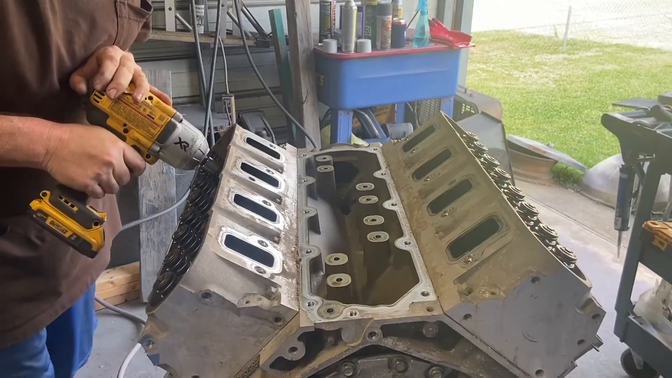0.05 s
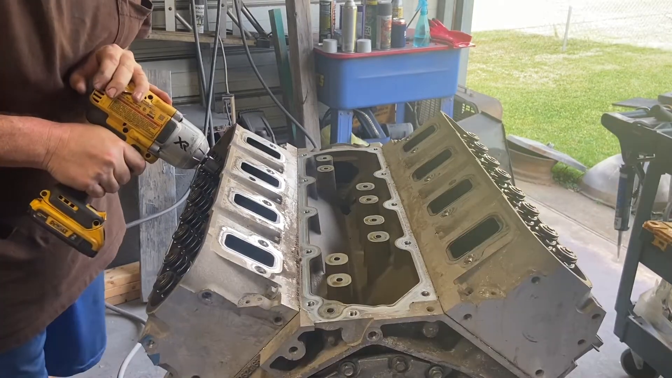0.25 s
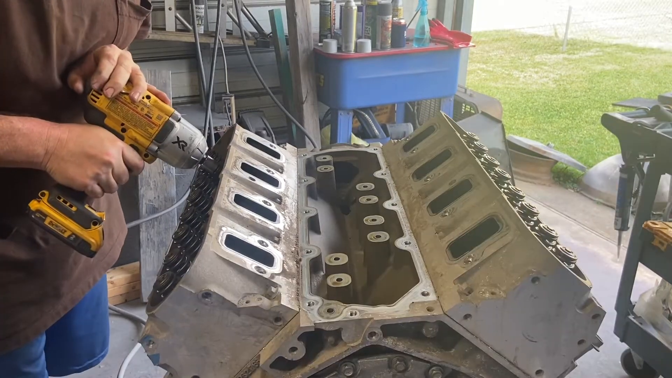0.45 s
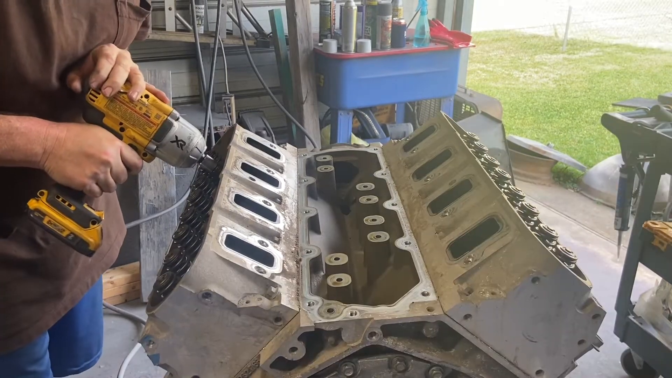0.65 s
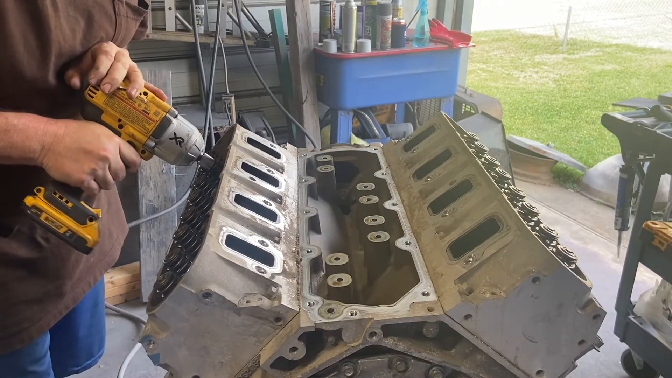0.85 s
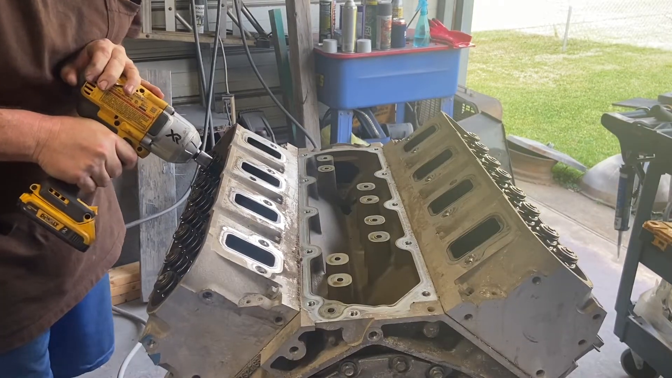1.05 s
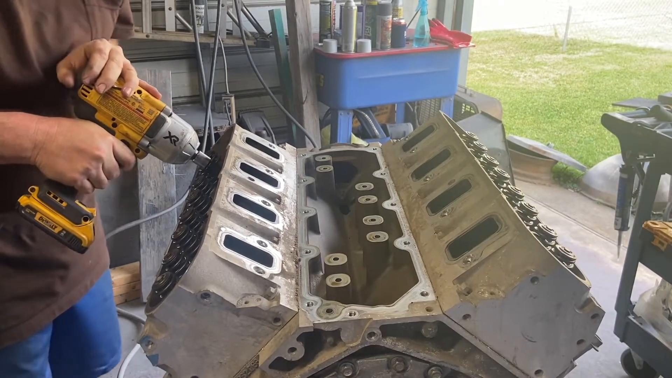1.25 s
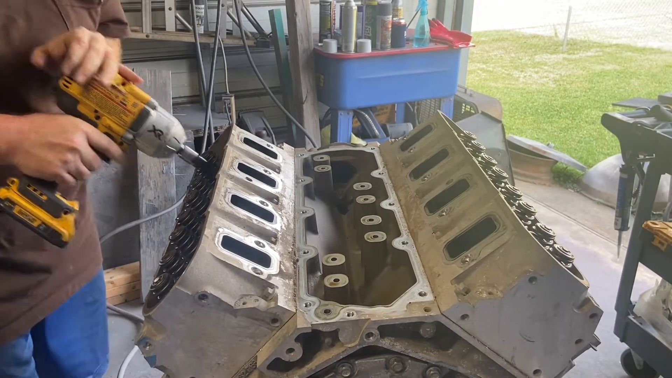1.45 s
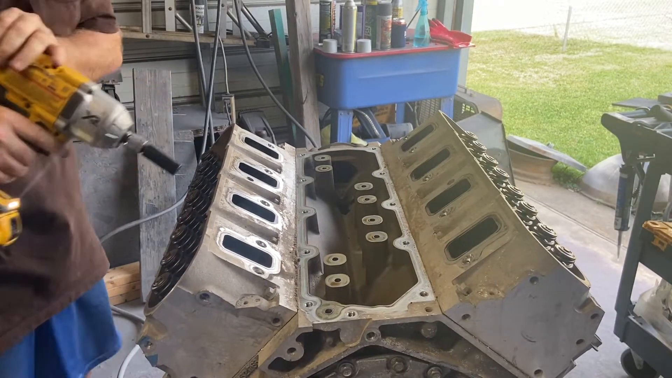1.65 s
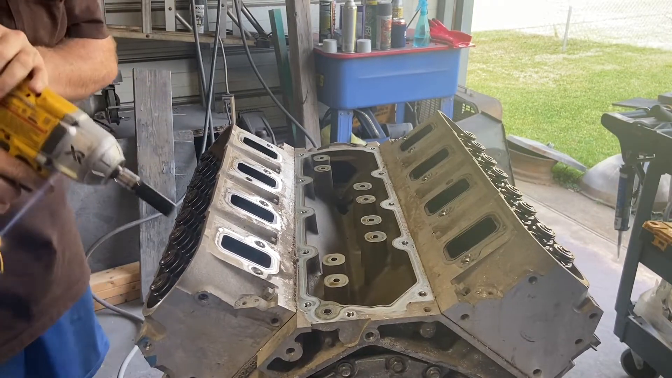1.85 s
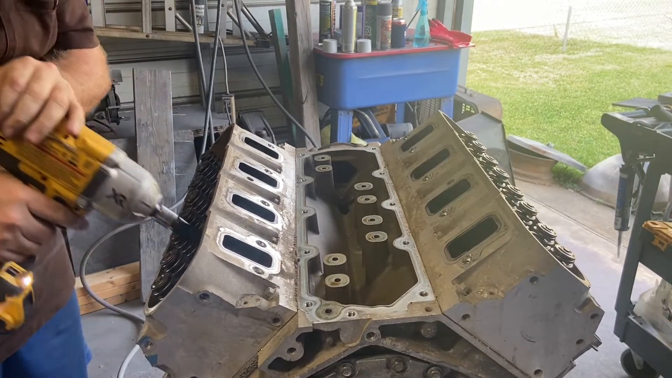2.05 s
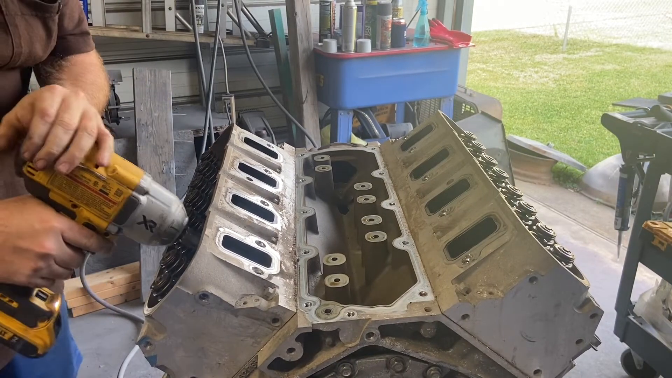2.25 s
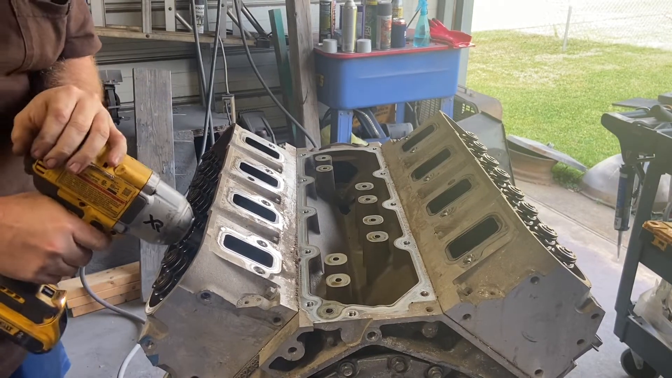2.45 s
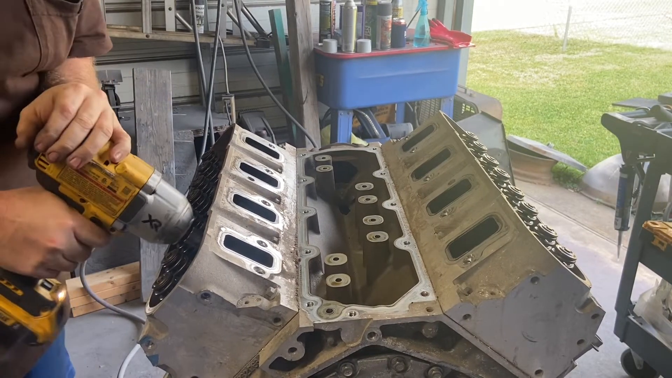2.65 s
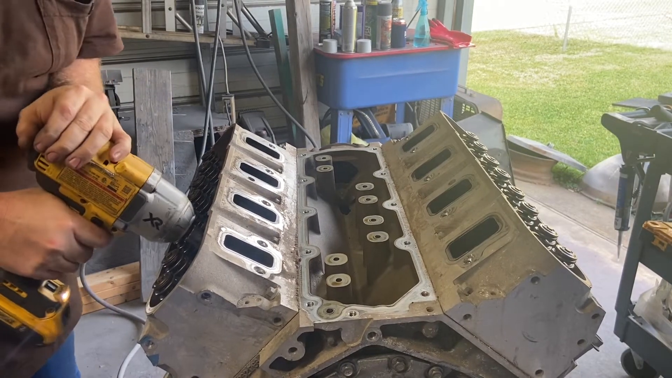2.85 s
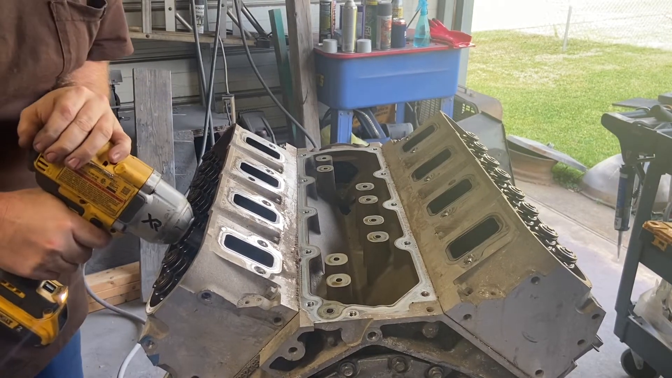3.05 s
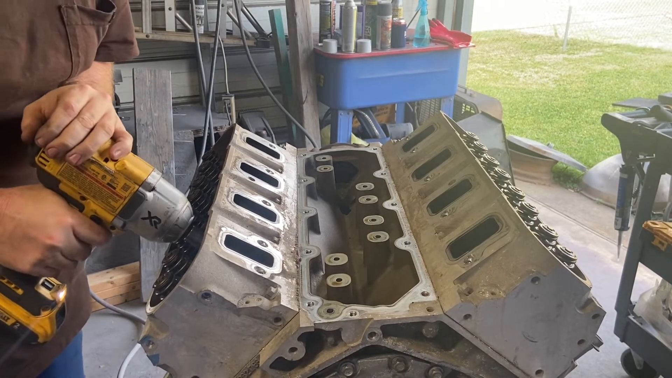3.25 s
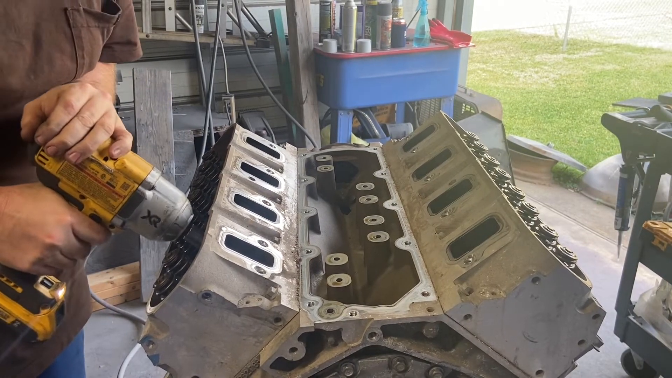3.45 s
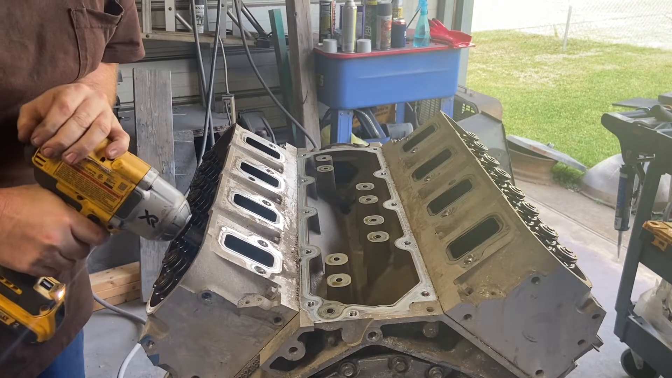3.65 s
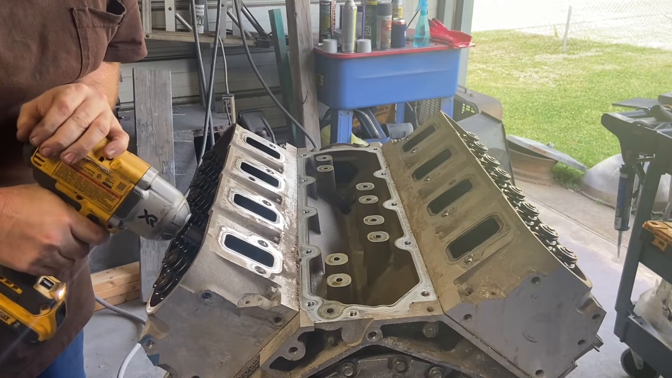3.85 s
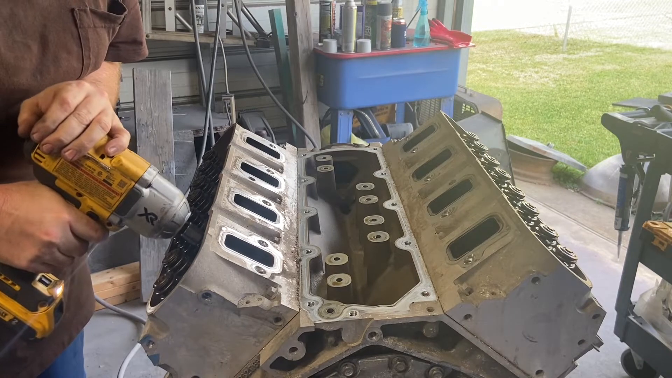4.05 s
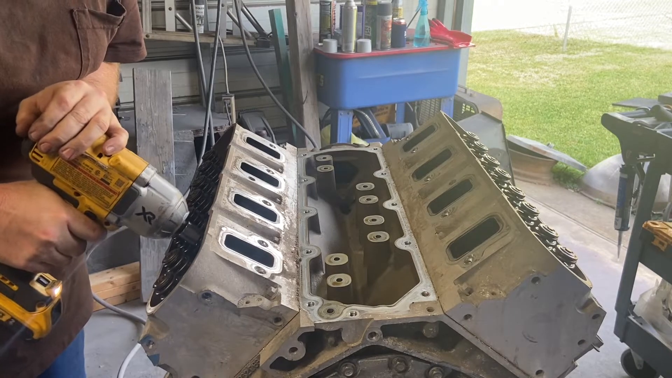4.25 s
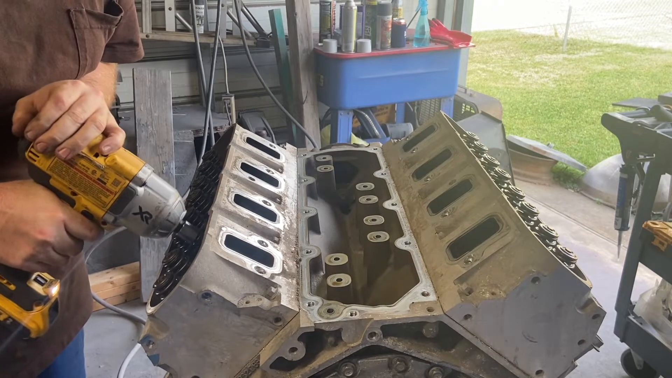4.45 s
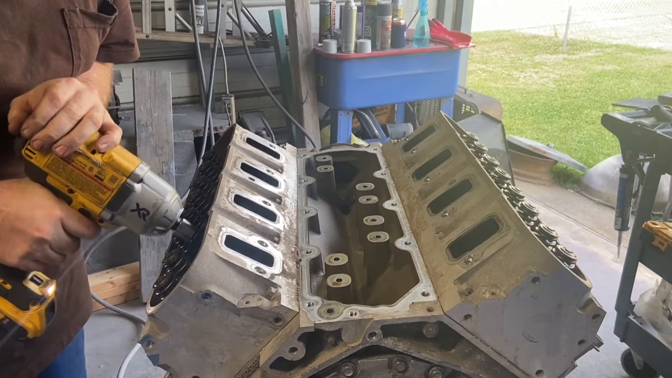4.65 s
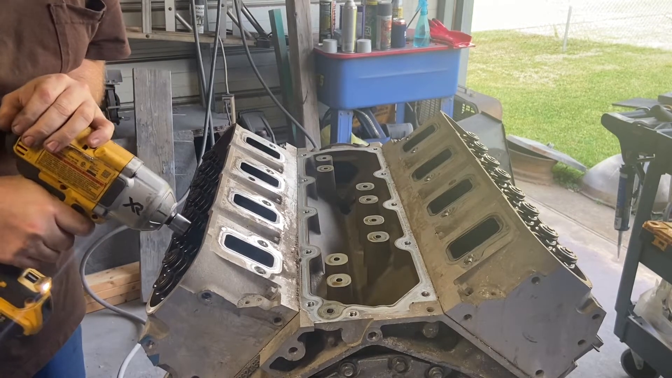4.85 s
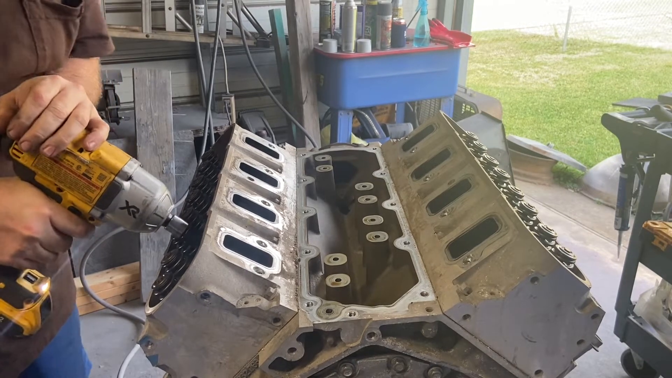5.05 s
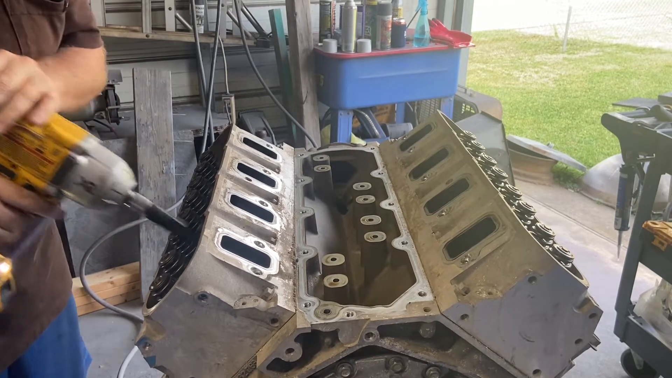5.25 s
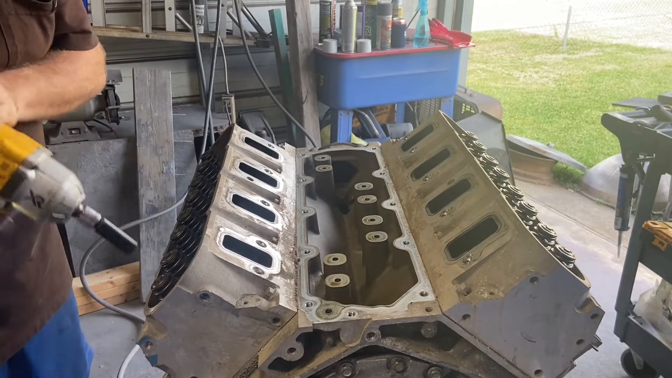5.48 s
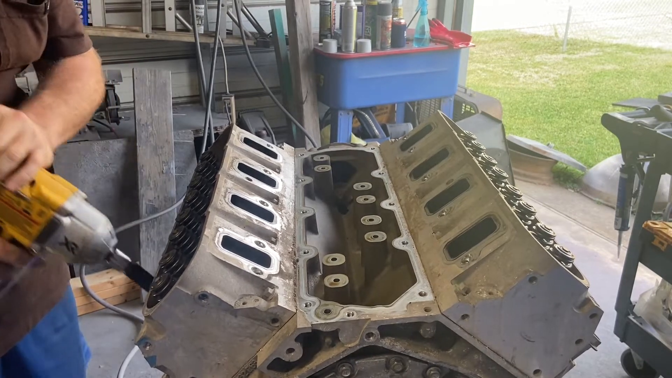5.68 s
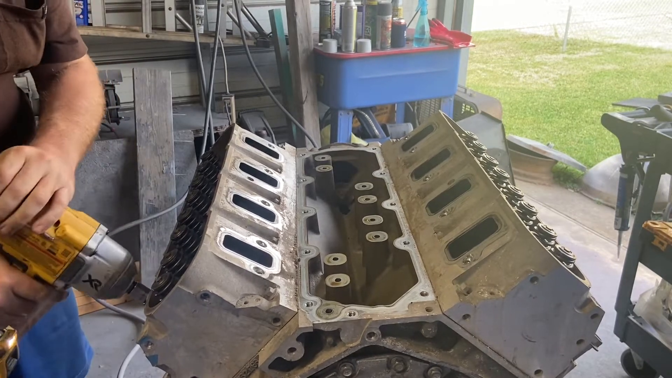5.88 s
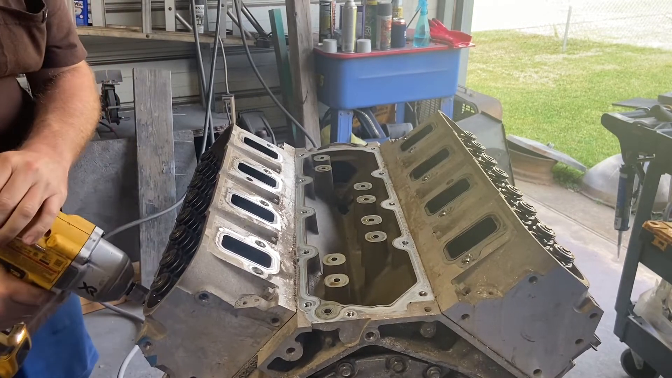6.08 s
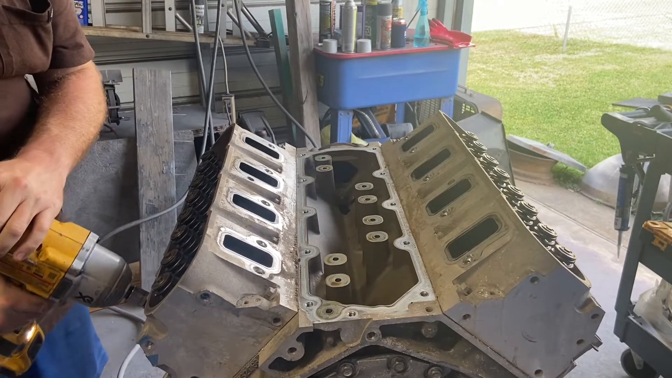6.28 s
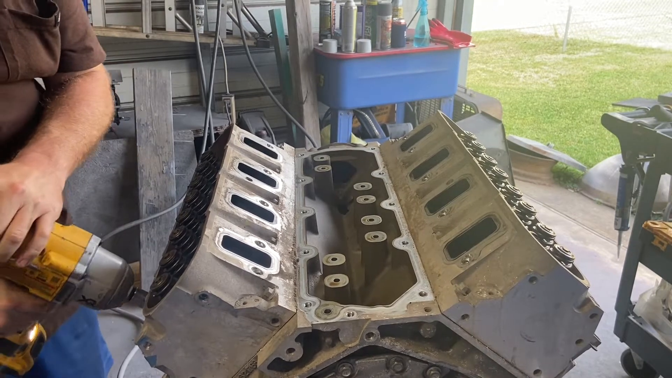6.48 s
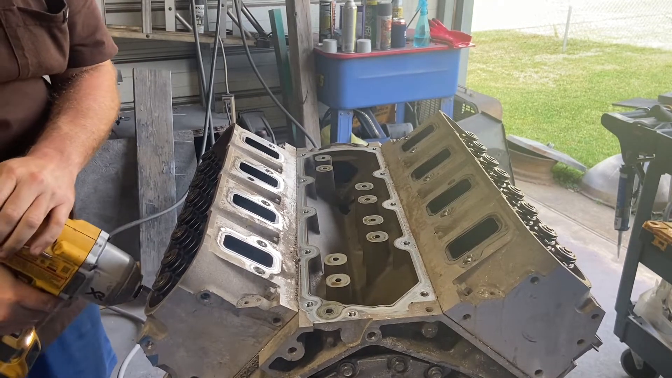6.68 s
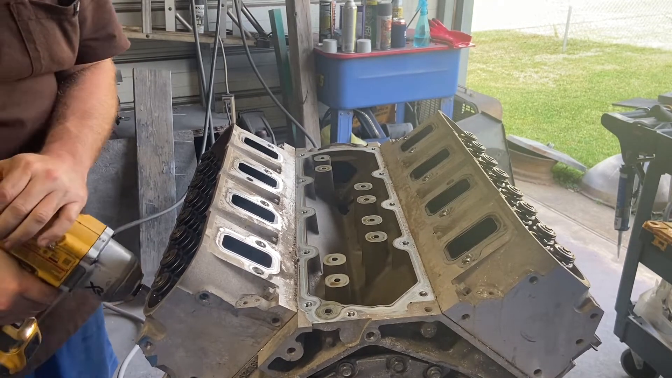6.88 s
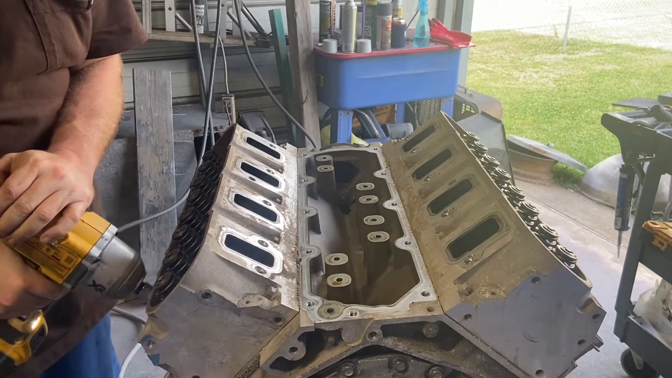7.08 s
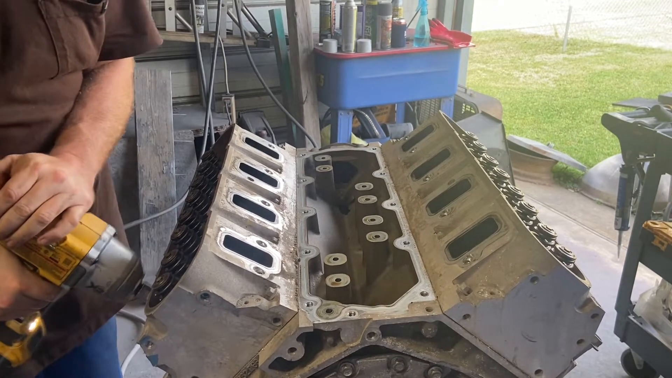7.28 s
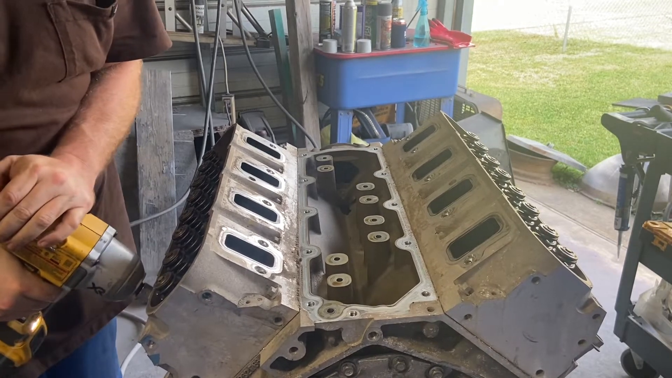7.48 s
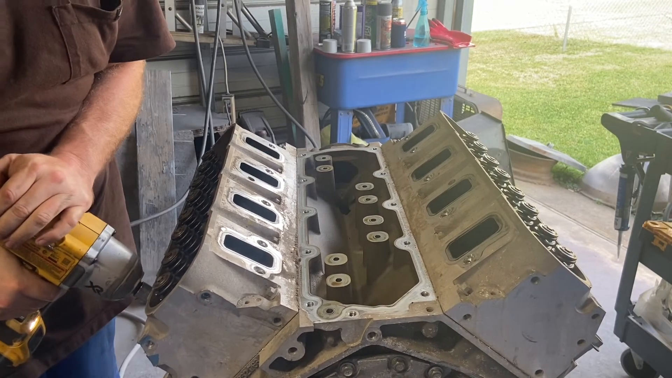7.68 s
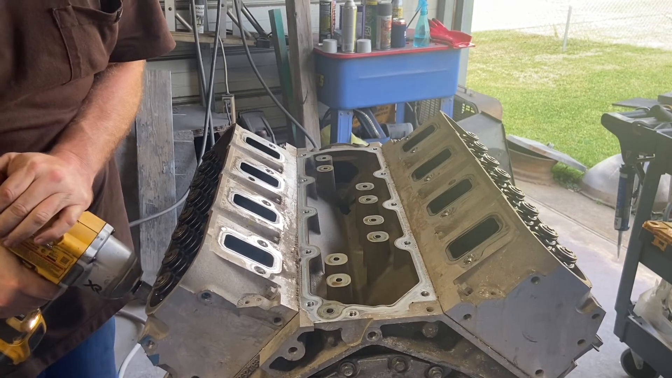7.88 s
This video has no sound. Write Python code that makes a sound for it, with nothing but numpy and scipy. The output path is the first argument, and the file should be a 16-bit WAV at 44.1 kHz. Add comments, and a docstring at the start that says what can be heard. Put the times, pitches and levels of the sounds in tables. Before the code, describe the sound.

Close, loud impact wrench on an iron engine block: a short hammering burst slows until the bolt gives, the motor whines up and brakes with a thin squeal. Socket knocks follow, then a longer burst and another spin-down, more knocks and a light scuff, and a third burst still running at the end. Open shed, short hard echoes, faint air and insects.

```python
"""A cordless impact wrench works on three bolts of an engine block in an open shed, over hum and insects.
Hammering on the first bolt slows until it gives; the freed motor whines, then brakes with a thin squeal.
Socket and trigger knock on the iron before a longer hammering frees the second bolt, with whine and brake again.
After more knocks and a scuff the third bolt is hammered and still holds at the end.
Blows are noise cracks with short rings, the motor is shaped noise and narrow bands, the shed is sparse taps."""
import sys
import numpy as np
from scipy import signal
from scipy.fft import rfft, irfft
from scipy.io import wavfile
from scipy.ndimage import uniform_filter1d

SR = 44100
rng = np.random.default_rng(int(sys.argv[2]) if len(sys.argv) > 2 else 0)


def voltage_ratio(decibels):
    """Convert decibels (scalar or array-like) to amplitude ratios, 20 dB per decade."""
    exponent = np.asarray(decibels, float) / 20
    return 10 ** exponent


def wav_out(sig):
    """Save sig, one row per channel (or a flat mono array), as 16-bit PCM at SR to the path in sys.argv[1]."""
    wavfile.write(sys.argv[1], SR, np.round(np.clip(np.atleast_2d(sig).T, -1, 1) * 32767).astype(np.int16))


N = 349272


def evened(x):
    """Normalisation of energy: scales every row to rms 1."""
    return x / np.sqrt(np.mean(x ** 2, axis=-1, keepdims=True) + 1e-20)


def read(points, hz):
    """Interpolation of a spectrum on a log-frequency axis."""
    point_hz, value = np.transpose(points)
    return np.interp(np.log(hz + 1), np.log(point_hz + 1), value)


def shelf(hz, corner_hz):
    """Shelving: the share of the treble is 0 well below the corner and 1 well above."""
    return 1 / (1 + (corner_hz / (hz + 1)) ** 4)


def add(mix, start_s, sound):
    """Superposition: adds a sound to the mix at its start time."""
    part = mix[round(start_s * SR):][:len(sound)]
    part += sound[:len(part)]


def hiss(points, size, patchy_db, treble_db=0):
    """Filtered noise: a given spectrum with drifting loud and soft patches; the treble may follow a curve."""
    real, imag, patches = rng.standard_normal((size // 128 + 5, 257, 3)).T
    patches = uniform_filter1d(patches, size=6, axis=0)
    patches = evened(uniform_filter1d(patches, size=10, axis=1))
    hz = np.fft.rfftfreq(512, 1 / SR)[:, None]
    tilt_db = np.pad(treble_db * np.ones(size), (0, 1024), "edge")[::128][:real.shape[1]]
    spectrum_db = read(points, hz) + patchy_db * patches + shelf(hz, corner_hz=7800) * tilt_db
    bins = (real + 1j * imag) * voltage_ratio(spectrum_db)
    return evened(signal.istft(bins, nperseg=512, noverlap=384)[1][:size])


def whistle(hz, width_hz, size):
    """Modulation by narrow noise: a tone blurred to a steep band of the given width."""
    r = np.exp(-np.pi * width_hz / SR)
    noise = rng.standard_normal((size + 4096, 2)) @ [1, 1j]
    blur = signal.lfilter([1], [1, -2 * r, r * r], noise)[4096:]  # settled part of the filter
    phase = 2 * np.pi * np.cumsum(hz * np.ones(size)) / SR
    return evened((blur * np.exp(1j * phase)).real)


# colour of the air from outside, relative: pitch_hz [Hz], level_db [dB per Hz]
YARD = [(35, -39.5), (55, -13.5), (90, -3), (280, -10), (700, -12), (1500, -19), (4000, -27.5),
        (7800, -36.5), (12000, -48), (16000, -63.5)]
# hum lines, then insects: pitch_hz [Hz], width_hz [Hz], level_db [dB]
HUM = [(105, 45, -59), (940, 30, -72), (9400, 600, -75), (10150, 600, -71)]


def yard():
    """Incoherent background: a broadband wash of air, wavering hum lines and a thin band of insects."""
    lines = sum(voltage_ratio(level_db) * whistle(hz, width_hz, N) for hz, width_hz, level_db in HUM)
    return voltage_ratio(-54.5) * hiss(YARD, N, patchy_db=2.0) + lines


# reverberation of the shed: pitch_hz [Hz], t60_s [s]
SHED = [(200, 0.41), (1000, 0.44), (3000, 0.36), (8000, 0.29), (15000, 0.34)]
# block, floor and wall; each comes up to 20 samples later: delay_ms [ms], level_db [dB over direct]
ECHOES = [(4.7, -8), (12, -14), (17, -13)]


def shed(x, direct, wet_db):
    """Reverberation: direct sound and near echoes, then sparse taps that build up and die band by band."""
    taps = np.zeros(SR)
    at = np.arange(300, SR - 20, 20) + rng.integers(0, 20, (SR - 301) // 20)
    taps[at] = rng.choice([-1., 1.], len(at))
    hz, t, bins = signal.stft(taps, SR, nperseg=128)
    decay_db = -60 * t / read(SHED, hz)[:, None]
    response = signal.istft(bins * voltage_ratio(decay_db), SR, nperseg=128)[1][:SR]
    response *= 1 - np.exp(-np.arange(SR) / SR / 0.016)  # build-up
    response *= voltage_ratio(wet_db) / np.linalg.norm(response)
    response[0] = direct
    for delay_ms, level_db in ECHOES:
        response[round(delay_ms * SR / 1000 + 20 * rng.random())] += direct * voltage_ratio(level_db)
    return signal.fftconvolve(x, response)[:N]


# colour of gear noise and of scuffs, relative: pitch_hz [Hz], level_db [dB per Hz]
GEARS = [(88, -45), (150, -21.5), (448, -2.5), (624, -6), (854, -2), (1630, -4.5), (2760, -1.5),
         (11300, -10.5), (16000, -21.5)]
# trigger pulls: squeezed_s, bolt_gives_s, released_s, rotor_stops_s [s], squeal_db [dB]
PULLS = [(-.8, .82, 1.362, 1.66, -44), (2.51, 4.63, 5.072, 5.38, -55), (6.945, 8.6, 9.1, 9.4, -50)]
# gears and fan around moments of a pull: offset_s [s from the moment], level_db [dB], treble_change_db [dB]
AFTER_SQUEEZE = [(-.004, -80, -8), (0, -46, -8), (.03, -34, -9), (.06, -24, -4), (.14, -23, 5),
                 (.5, -28, 1.5)]
AFTER_GIVE = [(-.02, -32, 6), (.125, -34, -6)]
AT_STOP = [(-.21, -37.5, 3), (-.14, -40.5, -12), (0, -48, -10.5), (.065, -60, -7.5), (.13, -71, -5)]


def gear_rattle():
    """Amplitude modulation: uneven tooth contacts roughen broadband gear noise through every pull."""
    stages = []
    for squeeze_s, give_s, _, stop_s, _ in PULLS:
        for moment_s, rows in ((squeeze_s, AFTER_SQUEEZE), (give_s, AFTER_GIVE), (stop_s, AT_STOP)):
            stages += [(moment_s + offset_s, db, treble_db) for offset_s, db, treble_db in rows]
    s, db, treble_db = np.transpose(stages)
    t = np.arange(N) / SR
    contacts = voltage_ratio(13.0 * uniform_filter1d(rng.standard_normal(N), size=60))
    noise = hiss(GEARS, N, patchy_db=1.6, treble_db=np.interp(t, s, treble_db))
    return voltage_ratio(np.interp(t, s, db)) * evened(noise * contacts)


def whine(t, spin_hz, braked_s):
    """Rotational tone: the whine swells as the freed rotor speeds up, then falls and dies as the brake bites."""
    hz = np.maximum(spin_hz - 17000 * braked_s, 4000)  # braking in Hz per s
    fade_db = 30 * braked_s + 600 * np.maximum(braked_s - .06, 0)
    return np.minimum(t / .4, 1) * voltage_ratio(-47.5 - fade_db) * whistle(hz, 40, len(t))


def gear_mesh(t, spin_hz, braked_s):
    """Tooth-passing tone: a fixed ratio to the unbraked whine, sagging under the brake, with its octave."""
    hz = .433 * spin_hz - 1100 * braked_s
    level_db = -42.5 - 8 * t - 30 * braked_s
    octave = voltage_ratio(level_db - 9 - 90 * braked_s) * whistle(2 * hz, 50, len(t))
    return voltage_ratio(level_db) * whistle(hz, 50, len(t)) + octave


def brake_squeal(squeal_db):
    """Narrow-band radiation: the electric brake squeals high, holds briefly and fades exponentially."""
    t = np.arange(SR // 2) / SR
    level_db = squeal_db - 140 * np.maximum(t - .09, 0)
    return np.minimum(t / .015, 1) * voltage_ratio(level_db) * whistle(14930, 50, len(t))


def housing(seconds):
    """Resonance: the housing sings in one narrow band until the rotor stops."""
    t = np.arange(0, seconds, 1 / SR)
    return voltage_ratio(-56) * np.sin(np.pi * t / seconds) ** .5 * whistle(6750, 200, len(t))


def motor():
    """Superposition of machine sounds: rattle in every pull, whine, mesh and braking in free spin."""
    out = gear_rattle()
    loaded_hz, free_hz, spin_up_s, coast_s = 5050, 6750, .3, .14
    for _, give_s, release_s, stop_s, squeal_db in PULLS[:2]:  # the last bolt still holds
        t = np.arange(0, stop_s - give_s, 1 / SR)
        driven_s = np.minimum(t, release_s - give_s)
        spin_hz = free_hz - (free_hz - loaded_hz) * np.exp(-driven_s / spin_up_s)
        braked_s = np.maximum(t - release_s + give_s, 0)
        add(out, give_s, whine(t, spin_hz, braked_s))
        add(out, give_s, gear_mesh(t, spin_hz, braked_s))
        add(out, release_s + .062, brake_squeal(squeal_db))
        add(out, stop_s - coast_s, housing(coast_s))
    return out


# hands and socket scuffing on the tool, one list a scuff: start_s [s], level_db [dB]
SCUFF = [
    [(2.45, -61), (2.51, -59)],
    [(6.2, -87), (6.4, -62), (6.5, -57), (6.7, -85)],
    [(6.89, -53), (6.95, -52)],
]


def scuffs():
    """Friction noise: rubbing is patchy noise in the gear colour with its treble cut."""
    out = np.zeros(N)
    for rows in SCUFF:
        s, db = np.transpose(rows)
        level_db = np.interp(np.arange(s[0], s[-1], 1 / SR), s, db)
        rub = hiss(GEARS, len(level_db), patchy_db=6.5, treble_db=-18)
        add(out, s[0], voltage_ratio(level_db) * rub)
    return out


# colour of a crack before its treble change, relative: pitch_hz [Hz], level_db [dB per Hz]
STEEL = [(88, -42.5), (150, -32), (226, -29.5), (422, -12.5), (624, -8.5), (1310, -6.5), (2980, -1),
         (5360, -4.5), (10200, -4.5), (16000, -13)]


def strikes(hz, treble_db, decay_s, ring_db, ring_s):
    """Impact excitation, one row a strike, rms 1 over 2 ms: a dying crack and a short ring at its own pitch."""
    t, f = np.arange(2048) / SR, np.fft.rfftfreq(2048, 1 / SR)
    colour = voltage_ratio(read(STEEL, f) + treble_db[:, None] * (shelf(f, corner_hz=4700) - .5))
    crack = evened(irfft(rfft(rng.standard_normal((len(hz), 2048))) * colour))
    crack *= (1 - np.exp(-t / 0.00005)) * np.exp(-t / decay_s[:, None])
    ring = np.sin(2 * np.pi * hz[:, None] * t)
    ring *= (1 - np.exp(-t / 0.00013)) * np.exp(-t / ring_s)
    both = crack + voltage_ratio(ring_db - .5 * treble_db[:, None]) * ring
    return both / np.sqrt(np.mean(both[:, :88] ** 2, axis=1, keepdims=True))


# socket, trigger and anvil slack, levels before the slow rise:
# start_s [s], level_db [dB], pitch_hz [Hz], treble_over_middle_db [dB], decay_ms [ms]
KNOCKS = [(.803, -22, 2100, -12, 3), (1.394, -27.5, 2040, -7, 4.6), (1.45, -50, 6000, -3.5, 6),
          (2.15, -45.5, 2540, -5, 6.6), (2.156, -36, 3030, -6.5, 5.8), (2.164, -19, 820, -16.5, 2.5),
          (2.26, -25.5, 6140, 2.5, 8.4), (2.51, -29.5, 2970, -10.5, 5.7), (2.546, -22.5, 2200, -21.5, 3.6),
          (2.591, -17, 2470, -12, 4), (2.603, -14, 2500, -7, 2.7), (4.614, -23, 2440, -5.5, 4.3),
          (4.949, -25.5, 2010, -24.5, 8), (5.122, -30, 2410, -12, 5.4), (5.164, -26, 2180, -9, 7.8),
          (5.793, -36, 4050, 1, 8), (5.802, -23.5, 2410, -14, 3.1), (6.452, -33, 5760, 0, 5),
          (6.95, -22, 2200, -6, 2.2), (6.979, -22, 4000, -19, 4), (6.989, -21, 6560, -12, 5.5)]
# clustered rings of the socket: centre_hz [Hz], width_hz [Hz], t60_s [s]
SOCKET = (5800, 1200, .3)


def knocks():
    """Modal excitation by hand: slow-rising contacts; bright ones ring the socket, dull ones thud in the block."""
    s, db, hz, treble_db, decay_ms = np.transpose(KNOCKS)
    contacts = strikes(hz, treble_db, decay_ms / 1000, ring_db=-4.5, ring_s=.002)
    contacts *= 1 - np.exp(-np.arange(2048) / SR / 0.00086)
    t, out = np.arange(SR // 3) / SR, np.zeros(N)
    centre_hz, width_hz, t60_s = SOCKET
    for k in range(len(s)):
        add(out, s[k], voltage_ratio(db[k]) * contacts[k])
        ring_db = db[k] + 1.3 * treble_db[k] - 15.5 - 60 * t / t60_s
        add(out, s[k], voltage_ratio(ring_db) * whistle(centre_hz, width_hz, len(t)))
        thud_db = db[k] - 0.54 * treble_db[k] - 16.0 - 60 * t / 0.076
        thud = whistle(450, 500, len(t)) * (1 - np.exp(-t / 0.0092))
        add(out, s[k], voltage_ratio(thud_db) * thud)
    return out


# pace of the hammer, one list a bolt: blow_number [count], gap_ms [ms since the blow before]
PACE = [
    [(1, 30.98), (17, 35.46), (19, 36.88), (22, 43.85), (23, 48.73)],
    [(1, 39.8), (2, 28.15), (4, 29.06), (8, 27.83), (15, 27.27), (16, 29.8), (20, 31.5), (23, 33.26),
     (27, 30.59), (29, 32.13), (34, 30.34), (38, 31.38), (41, 30.93), (45, 31.58), (48, 34.26), (51, 34.79),
     (56, 38.56), (57, 40.97), (58, 37.99), (61, 40.56), (63, 47.82)],
    [(1, 33.01), (2, 29.2), (8, 27.66), (14, 27.5), (17, 27.52), (18, 30.84), (21, 31.71), (23, 34.99),
     (26, 33.8), (28, 34.05), (30, 32.38)],
]
# first blow on each bolt: start_s [s]
FIRST_BLOW_S = [.0034, 2.5741, 7.0005]
# base strength on each bolt; two lugs strike in turn: level_db [dB], odd_over_even_db [dB]
BOLTS = [(-12.5, 1.7), (-11.5, 2), (-12, -1)]
# blows that land square or glance off: start_s [s], level_change_db [dB]
ODD_BLOWS = [(.129, 1.5), (.259, -1.5), (.36, 0), (.428, 1.5), (.463, -1.5), (.642, -1.5), (.814, 1.8),
             (2.574, -5), (2.642, 4), (2.671, 3.5), (2.729, -2.6), (2.841, 1.5), (2.924, 0.5), (2.951, -4),
             (3.159, -7.5), (3.191, 0.5), (3.257, -3.5), (3.414, -7.5), (3.447, -1.5), (3.541, 3.5),
             (3.663, -3), (3.726, -2.5), (3.882, 1.7), (4.148, 1.4), (4.295, 1.5), (4.375, -1), (4.491, -1),
             (7.0, 4), (7.033, 3.5), (7.063, 5), (7.12, 0.5), (7.205, -0.7), (7.26, 0.5), (7.453, -2.4),
             (7.742, 3), (7.776, 2)]


def blows():
    """Periodic impact: time and tightness follow from the gaps; level also from bolt, lug and listed odd blows."""
    rows = []
    for pace, first_s, (bolt_db, lug_db) in zip(PACE, FIRST_BLOW_S, BOLTS):
        number, ms = np.transpose(pace)
        k = np.arange(number[-1] + 1)
        gap_ms = np.interp(k, number, ms)
        s = first_s + (np.cumsum(gap_ms) - gap_ms[0]) / 1000
        gap_ms = np.minimum(gap_ms, np.append(gap_ms[1:], gap_ms[-1]))  # shorter neighbouring gap
        db = bolt_db + lug_db * (k % 2 - .5) - 0.0831 * (gap_ms - 32)  # slow blows are weaker
        tight = np.clip((31.5 - gap_ms) / 3, 0, 1)
        rows.append([s, db, tight])
    s, db, tight = np.hstack(rows)
    db = db - 1.3 * tight
    odd_s, odd_db = np.transpose(ODD_BLOWS)
    nearest = abs(s[:, None] - odd_s).argmin(axis=0)
    db[nearest] += odd_db
    return s, db, tight[:, None]


# short rings of anvil, bolt and block, one at random a blow: pitch_hz [Hz]
BLOCK_HZ = [2050, 2550, 2950, 3350, 4000]


def hammer():
    """Repeated impact: fast blows on a tight bolt chatter in the socket; a loose bolt gives slow, dry cracks."""
    s, db, tight = blows()
    pick, scatter, low = rng.random((len(s), 3)).T
    hz = np.array(BLOCK_HZ)[(pick * len(BLOCK_HZ)).astype(int)]
    # square blows drive the block and sound full, glancing ones are weak and bright
    over_neighbours_db = db - uniform_filter1d(db, size=7)
    treble_db = -over_neighbours_db + 6 * (scatter - .5) - 1
    blow = strikes(hz, treble_db, .0014 + 0 * s, ring_db=-4, ring_s=.001)
    t = np.arange(2048) / SR
    chatter = strikes(hz, treble_db - 2.5, 0.041 + 0 * s, ring_db=-5.5, ring_s=0.0025)
    chatter *= voltage_ratio(2.4 * rng.standard_normal((len(s), 64))).repeat(32, axis=1)  # uneven contacts
    chatter *= 1 / (1 + (t / .007) ** 4)
    thump_hz = 400 + 450 * low[:, None]
    thump = np.sin(2 * np.pi * thump_hz * t) * t / 0.0047 * np.exp(1 - t / 0.0041)
    blow += voltage_ratio(-11.5 + 10 * tight) * chatter
    blow += voltage_ratio(-31.0 + 5.4 * tight) * thump
    # blows take turns through three draws of the shed's echoes, so no steady comb tone builds up
    turns = np.zeros((3, N))
    for k in range(len(s)):
        add(turns[k % 3], s[k], voltage_ratio(db[k]) * blow[k])
    return turns


def scene():
    """Directivity: steel radiates another crack in every direction, so the walls return several versions."""
    tool = motor()
    for direct in (1, 0, 0):  # one version heard directly, two only from the walls
        tool += sum(shed(turn, direct, wet_db=-10) for turn in hammer())
        tool += shed(knocks() + scuffs(), direct, wet_db=-9.5)
    small_parts = signal.butter(2, 250, "high", fs=SR, output="sos")  # small parts give no bass
    tool = signal.sosfilt(small_parts, tool)
    return (tool + yard())[None]


def roll_off(x):
    """The treble ends steeply here."""
    return signal.sosfilt(signal.butter(12, 16810, fs=SR, output="sos"), x)


def record(dry):
    """Saturation and band limiting: soft overload on the hardest blows, then a steep low-pass."""
    x = dry / (1 + (abs(dry) / .88) ** 4) ** .25
    low_pass = signal.firwin(255, 15800, window=("kaiser", 4), fs=SR)
    mix = signal.oaconvolve(x, low_pass[None], "same")
    return roll_off(mix)


dry = scene()
out = record(dry)
wav_out(out)
```